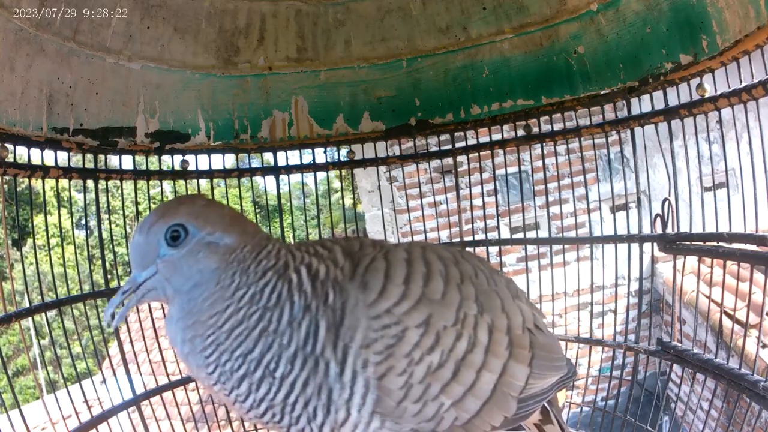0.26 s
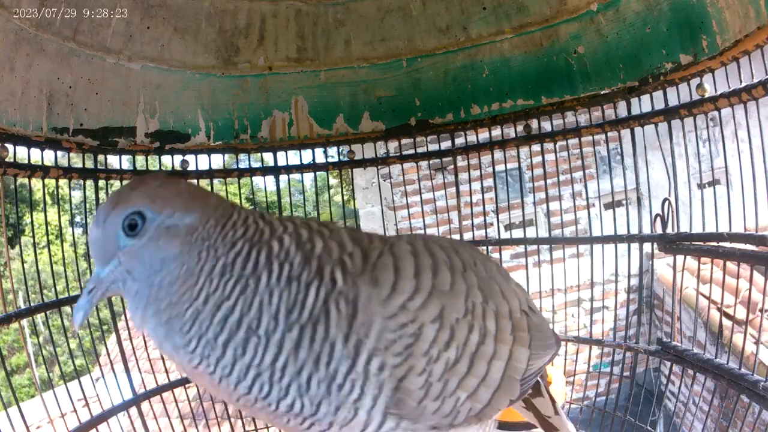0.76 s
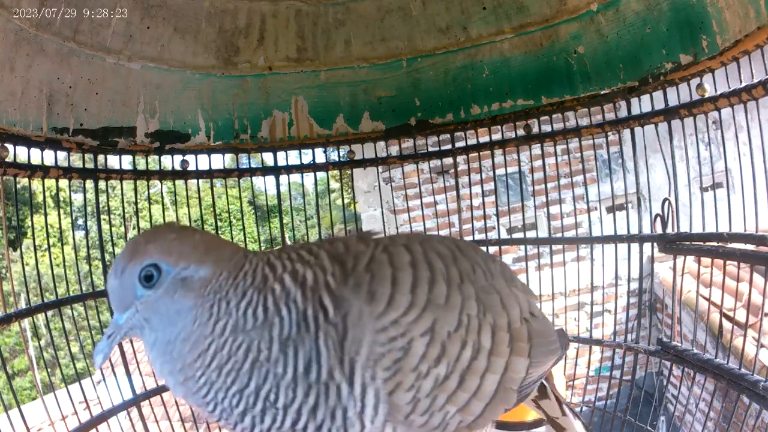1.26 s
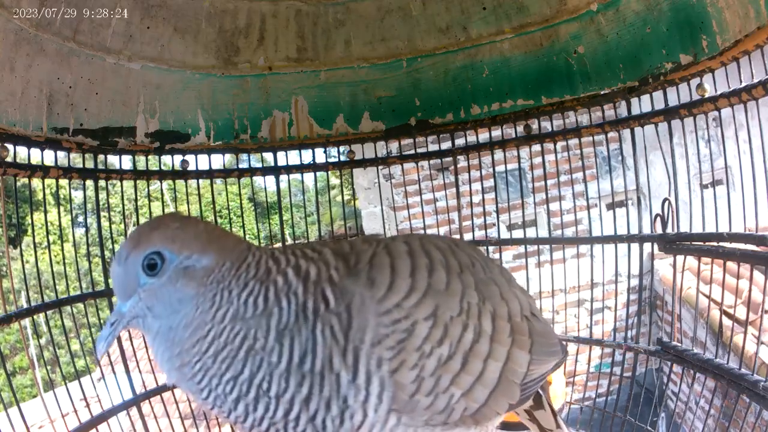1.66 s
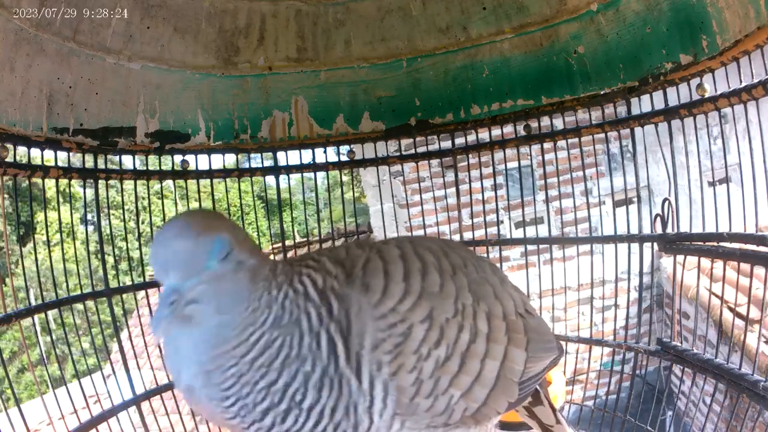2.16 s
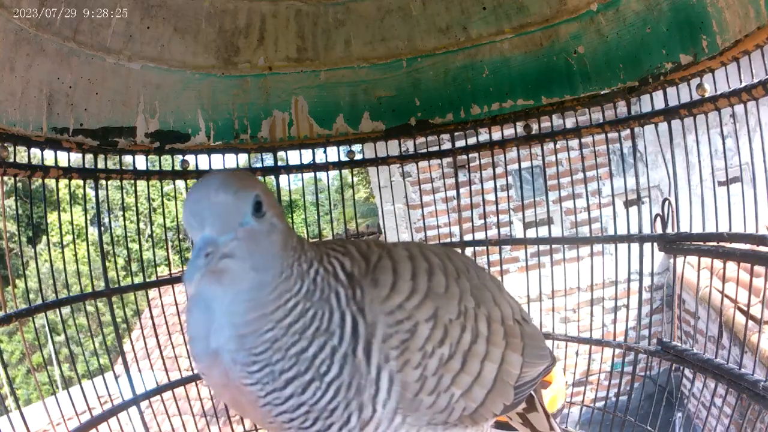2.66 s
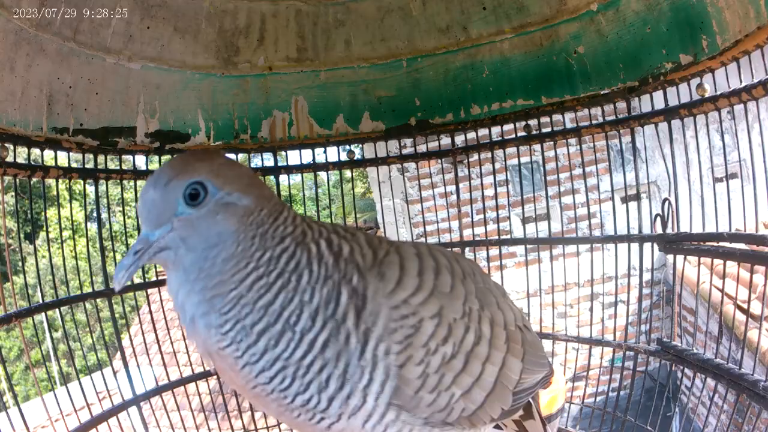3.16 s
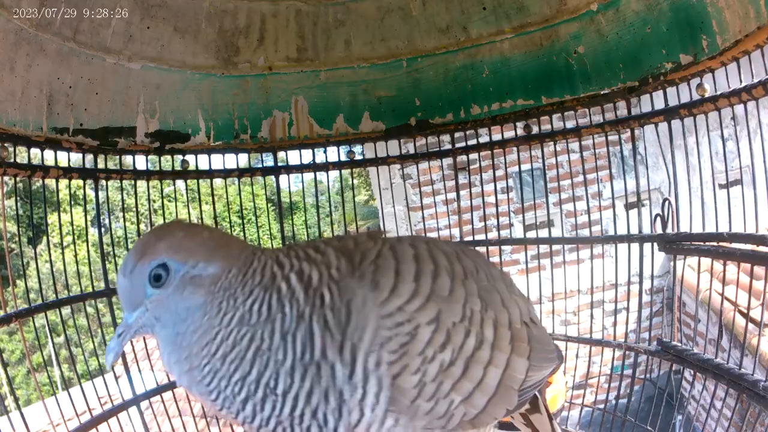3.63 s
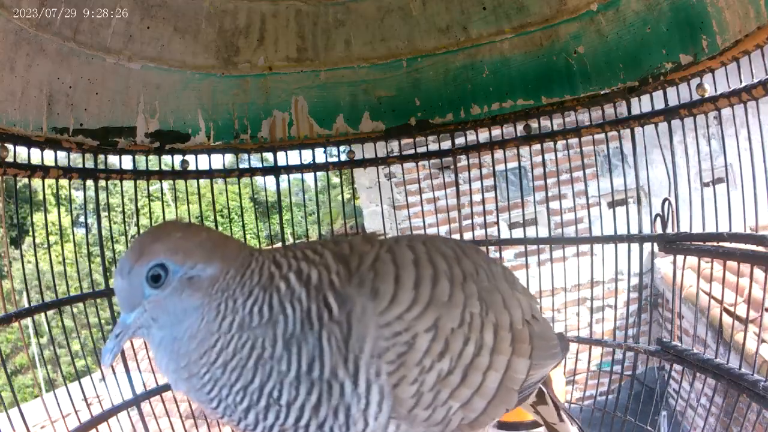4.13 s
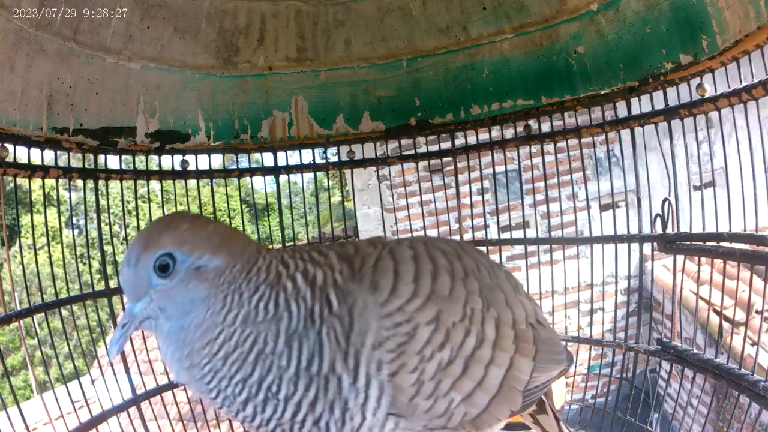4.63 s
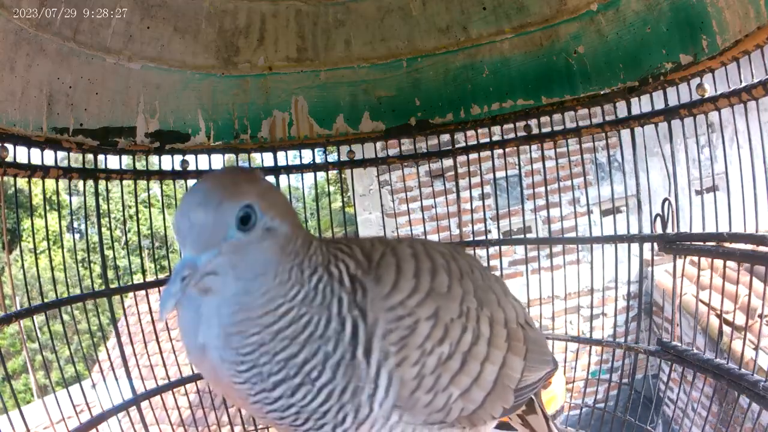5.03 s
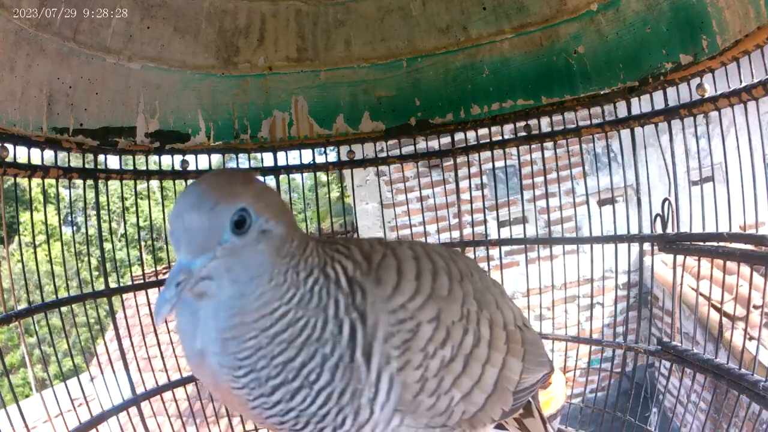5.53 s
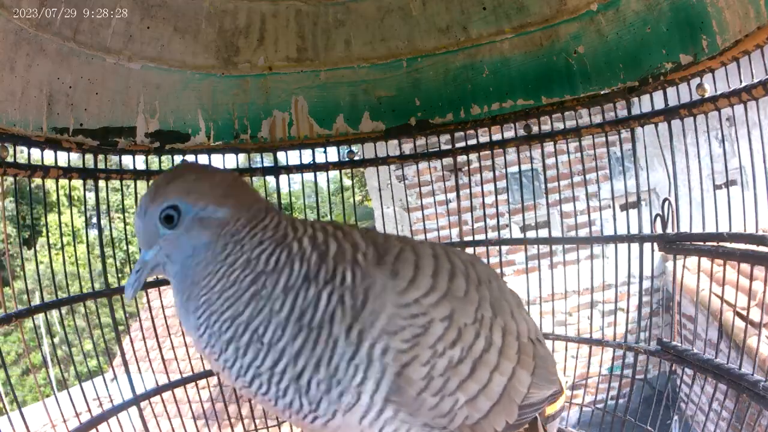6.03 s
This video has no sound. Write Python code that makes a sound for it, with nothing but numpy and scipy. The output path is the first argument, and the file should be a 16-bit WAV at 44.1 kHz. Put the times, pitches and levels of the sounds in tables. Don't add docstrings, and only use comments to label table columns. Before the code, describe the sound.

A quiet outdoor bed runs throughout: low wind buffeting the microphone, steady town rumble, slight hum and hiss, barely audible high insects. Around 0.3-0.6 s distant hoarse fowl call, and a tiny claw tick lands near 0.5. At 0.84 a soft hollow pop precedes the close dove's first burst: a loud note leaping upward at 0.9, a low grunt at 1.15, a short arched coo, then a longer falling one ending near 1.36. Background returns, with faint fowl at 2.3-2.8. Far doves answer from 3.05, blurred by echo. Another pop at 3.52 starts the second burst: leaping note at 3.59, grunt at 3.76, then four quick arched whistles, rising in pitch, the last longest, ending about 4.19. Slight cage echoes follow. Clearer hoarse fowl sound at 4.6-5.2; distant doves reply again from 6.0 to the end.

```python
import sys
import numpy as np
from scipy import signal
from scipy.fft import rfft, irfft, next_fast_len
from scipy.io import wavfile
from scipy.ndimage import uniform_filter1d, map_coordinates

SR = 44100
rng = np.random.default_rng(int(sys.argv[2]) if len(sys.argv) > 2 else 0)


def invert_db(x):
    u = np.asarray(x, float) / 20
    return 10 ** u


def digitize_waveform(pressure):
    field = np.atleast_2d(pressure).T
    bounded = np.clip(field, -1, 1)
    quanta = np.round(bounded * 32767).astype(np.int16)
    wavfile.write(sys.argv[1], SR, quanta)


N = 277389


def unit(x):
    return x / np.sqrt(np.mean(x ** 2) + 1e-20)


def along(points, hz):
    f, v = np.transpose(points)
    return np.interp(np.log(hz + 1), np.log(f + 1), v)


def add(track, s, sound):
    part = track[round(s * SR):][:len(sound)]
    part += sound[:len(part)]


def wobble(rate, size=N):
    knots = rng.standard_normal(int(size * rate / SR) + 4)
    return map_coordinates(knots, [np.arange(size) * rate / SR])


def noise(spectrum):
    m = next_fast_len(N + 8192)
    gain = invert_db(along(spectrum, np.fft.rfftfreq(m, 1 / SR)))
    return unit(irfft(rfft(rng.standard_normal(m)) * gain, m)[:N])


def tail(t60, rise):
    t = np.arange(SR // 2) / SR
    x = rng.standard_normal(len(t)) * invert_db(-60 * t / t60) * (1 - np.exp(-t / rise))
    return x / np.linalg.norm(x)


def swells(rows):
    out = np.zeros(N)
    for s, length, db in rows:
        add(out, s, invert_db(db) * np.hanning(round(length * SR)))
    return out


# peak in seconds, half width in seconds, level in dB.
PUFFS = [(0, 0.058, -54), (.33, 0.15, -50.5), (.66, 0.082, -45.5), (.95, 0.076, -49), (1.26, 0.17, -51.5),
         (1.68, 0.13, -49.5), (1.98, 0.19, -49), (2.33, 0.041, -53.5), (3.62, 0.12, -57),
         (4.27, 0.083, -50.5), (4.4, 0.048, -46), (4.74, 0.16, -55.5), (5.14, 0.12, -57),
         (5.4, 0.11, -57.5), (5.8, .22, -58)]
# frequency in Hz, density in dB per Hz.
GUSTS = [(7.1, -29), (12, 6.5), (22, 1), (56, 0.5), (135, -17.5), (160, -16), (210, -39), (350, -120)]


def wind():
    t = np.arange(N) / SR
    strength = invert_db(-61.5)
    for peak, width, db in PUFFS:
        strength = strength + invert_db(db) * np.exp(-((t - peak) / width) ** 2)
    return strength * unit(invert_db(1.8 * wobble(13)) * noise(GUSTS))


# frequency in Hz, density in dB per Hz.
TOWN = [(71, -39), (120, 0), (196, -7), (289, -7.5), (355, -12), (656, -10), (698, -12), (1160, -18.5),
        (1260, -21.5), (3520, -30.5), (14200, -33), (16000, -29)]


def town():
    return invert_db(-59 + .13 * wobble(3)) * noise(TOWN)


# frequency in Hz, level in dB.
HUM = [(100, -65.5)]


def hum():
    t = np.arange(N) / SR
    out = np.zeros(N)
    for hz, db in HUM:
        level = invert_db(db + 1.5 * wobble(4)) * np.sqrt(2)
        out += level * np.sin(2 * np.pi * hz * t + .4 * wobble(6))
    return out


# frequency in Hz, density in dB per Hz.
INSECTS = [(9000, -60), (9700, -6), (10000, 0), (10500, -6), (11500, -60)]


def insects():
    return invert_db(-86) * noise(INSECTS)


# pitch in Hz, gain on the fundamental in dB.
CROP = [(700, 0), (860, 6), (980, 6), (1100, 0), (1400, 0)]


def crop_db(pitch):
    return along(CROP, pitch)


def far_calls(calls, waver, flutter_db, direct_db, crest):
    out = np.zeros(N)
    for s, length, start_hz, top_hz, end_hz, db in calls:
        u = np.linspace(0, 1, round(length * SR))
        before, after = (top_hz - start_hz) / crest ** 2, (top_hz - end_hz) / (1 - crest) ** 2
        glide = top_hz - np.where(u < crest, before, after) * (u - crest) ** 2
        pitch = glide * (1 + waver * wobble(150, len(u)))
        envelope = np.abs(np.sin(np.pi * u)) ** .3 * invert_db(flutter_db * wobble(70, len(u)))
        call = envelope * np.sin(2 * np.pi * np.cumsum(pitch) / SR) * invert_db(.7 * crop_db(pitch))
        wet = signal.fftconvolve(call, tail(.17, rise=.003))
        add(out, s, invert_db(db) * wet * np.linalg.norm(call) / np.linalg.norm(wet))
        add(out, s, invert_db(db + direct_db) * call)
    return out


# start in seconds, length in seconds, start Hz, end Hz, level in dB.
FOWL = [(.31, .06, 1680, 1650, -70), (.37, .12, 1440, 1380, -70), (.46, .16, 1668, 1460, -73),
        (2.31, .18, 2700, 2620, -80), (2.38, .095, 1290, 1300, -73), (2.74, .12, 1490, 1490, -74),
        (4.63, .13, 935, 940, -68.5), (4.715, .2, 2440, 2370, -78), (4.80, .095, 1210, 1165, -57.5),
        (4.9, .1, 1180, 1170, -68), (4.86, .07, 1420, 1400, -72), (4.99, .2, 679, 670, -66.5)]
# start in seconds, length in seconds, level in dB.
RASPS = [
    (0.28, 0.38, -66),
    (2.247, 0.32, -69),
    (2.68, .25, -73),
    (4.72, .27, -70),
]
# frequency in Hz, density in dB per Hz.
RASP = [(700, -35), (1300, 12), (2500, -6), (4000, -8), (6000, -42)]


def fowl():
    calls = [(s, length, a, 1.01 * (a + b) / 2, b, db) for s, length, a, b, db in FOWL]
    tones = far_calls(calls, waver=.03, flutter_db=4, direct_db=-4, crest=.4)
    return tones + swells(RASPS) * noise(RASP)


# time in seconds, peak level in dB.
TICK = [
    (0.4763, -46.5),
]


def tick():
    out, t = np.zeros(N), np.arange(200) / SR
    for s, db in TICK:
        add(out, s, invert_db(db - 60 * t / .0036) * rng.standard_normal(200))
    band = signal.butter(3, [2200, 9500], "bandpass", fs=SR, output="sos")
    return signal.sosfilt(band, out)


POPS = [
    .8426,
    3.5226,
]
# frequency in Hz, level in dB, t60 in seconds.
KNOCK = [(870, 0, .02), (620, -6, .013), (1390, -5, .017)]


def creaks():
    out, t = np.zeros(N), np.arange(SR // 16) / SR
    soft_edge = (1 - np.exp(-t / .0005)) ** 2
    crop, *sides = [soft_edge * invert_db(db - 60 * t / t60) * np.cos(2 * np.pi * hz * (t - .0012))
                    for hz, db, t60 in KNOCK]
    # start s, end s, level dB, side modes dB
    runs = [(s, s + .0014, -21, -13) for s in POPS]
    runs += [(row[0] - .0148, row[0], -27, -2) for row in LEADS]
    runs += [(row[0] - .0148, row[0], -29, -2) for row in GRUNTS]
    runs += [(row[0] - .007, row[0] + .0003, -26, -3) for row in ARCS]
    runs[-1] = (runs[-1][0] - .0015, *runs[-1][1:])
    first_gap, last_gap = .0037, .0028
    for start, end, db, side_db in runs:
        s, shortfall = start - .0009, .55
        while s < end - .001:
            ring = crop + sum(invert_db(side_db + rng.normal(0, 1.5)) * side for side in sides)
            add(out, s, invert_db(db) * (1 - shortfall) * ring)
            s += np.interp(s, [start, max(end - last_gap, start + 1e-4)], [first_gap, last_gap])
            shortfall *= .4
    return invert_db(4) * signal.sosfilt(signal.butter(4, 1900, fs=SR, output="sos"), out)


# seconds after its start, pitch in Hz, effort in dB.
LEAD = [(0, 755, -31), (.004, 830, -26.5), (.0155, 890, -24.5), (.0183, 1045, -34), (.021, 1115, -28),
        (.041, 1284, -28), (.048, 1255, -29), (.056, 1115, -37), (.063, 1098, -50)]
# start in seconds, time stretch as a ratio, level in dB.
LEADS = [
    (.899, 1, 0),
    (3.585, 1, 0),
]
# seconds after its start, pitch in Hz, effort in dB.
GRUNT = [(0, 770, -31), (.003, 810, -28.5), (.008, 800, -29.5), (.013, 760, -34), (.017, 755, -35),
         (.021, 735, -52)]
# start in seconds, time stretch as a ratio, level in dB.
GRUNTS = [
    (1.145, 1, -.5),
    (3.76, 1.2, -1.5),
]


def leads_and_grunts():
    shaped = []
    for rows, shape in [(LEADS, LEAD), (GRUNTS, GRUNT)]:
        s, hz, level = np.transpose(shape)
        shaped += [(start + stretch * s, hz, level + db) for start, stretch, db in rows]
    return shaped


def arc(start, length, top_hz, end_hz, fade_db):
    s = np.arange(0, length, .0005)
    onset_hz, clear_hz, scoop_s, release_s = 775, 1115, .0106, .007
    crest, held = .012 + .225 * length, length - release_s
    scoop = onset_hz + (clear_hz - onset_hz) * (s / scoop_s) ** 1.25
    rise = top_hz - (top_hz - clear_hz) * ((crest - s) / (crest - scoop_s)).clip(0) ** 1.25
    fall = top_hz - (top_hz - end_hz) * ((s - crest) / (held - crest)).clip(0, 1) ** 2.2
    hz = np.where(s < scoop_s, scoop, np.where(s < crest, rise, fall))
    release = np.clip((s - held) / release_s, 0, 1)
    attack_db = 3 * np.clip(1 - s / .002, 0, 1)
    droop_db = 55 * s
    fading = np.minimum(s / held, 1) ** 7
    db = -27.4 - attack_db - droop_db - fade_db * fading
    return start + s, hz - 28 * release, db - 16 * release


# start in seconds, length in seconds, top Hz, end Hz, fade in dB.
ARCS = [
    (1.188, .049, 1208, 935, 12),
    (1.271, .084, 1284, 900, 1),
    (3.806, .034, 1122, 1020, 11),
    (3.866, .045, 1195, 945, 12),
    (3.955, .052, 1245, 940, 7),
    (4.0815, .1055, 1303, 930, 6),
]
# frequency in Hz, gain in dB.
THROAT = [(1500, 7.5), (1800, -17), (2200, -34), (2600, -23), (3800, -32), (5100, -38), (6200, -28),
          (6800, -32.5), (7500, -41), (8400, -50.5), (10400, -46), (14000, -50)]
# pitch in Hz, gain in dB.
OPENING = [(750, -26), (1000, -18), (1110, -3), (1300, 0)]
# frequency in Hz, density in dB per Hz.
HUSK = [(200, -6.5), (400, -13.5), (900, -3), (2000, -17), (2800, -29.5), (7000, -36), (10000, -57)]


def whistles():
    out, husk = np.zeros(N), noise(HUSK)
    for s, hz, db in leads_and_grunts() + [arc(*row) for row in ARCS]:
        t = np.arange(s[0] - .002, s[-1] + .002, 1 / SR)
        glide = uniform_filter1d(np.interp(t, s, hz), size=45)
        pitch = glide * (1 + .008 * wobble(250, len(t)))
        phase = 2 * np.pi * np.cumsum(pitch) / SR
        edges = np.clip(np.minimum(t - t[0], t[-1] - t) / .0045, 0, 1)
        effort = invert_db(np.interp(t, s, db) + .5 * wobble(300, len(t))) * edges * np.sqrt(2)
        slack_db = 26 * ((t - t[0]) / (t[-1] - t[0])) ** 5
        bright_db = along(OPENING, pitch) - slack_db
        voice = invert_db(crop_db(pitch)) * np.sin(phase)
        voice += invert_db(-24.5) * husk[round(t[0] * SR):][:len(t)]
        for k in range(2, 12):
            scatter_db = 2.5 * wobble(90, len(t))
            level = invert_db(along(THROAT, k * pitch) + bright_db + scatter_db)
            voice += level * np.sin(k * phase + rng.uniform(0, 2 * np.pi))
        add(out, t[0], effort * voice)
    return out


# delay in seconds, level in dB.
WALLS = [(.008, -29), (.019, -29), (.032, -32), (.055, -40), (.080, -43)]


def cage(x):
    out = x + invert_db(-34) * signal.fftconvolve(x, tail(.25, rise=.015))[:N]
    for s, db in WALLS:
        add(out, s, invert_db(db) * x)
    return out


# start in seconds, length in seconds, start Hz, top Hz, level in dB.
HELD = [
    (3.05, .07, 880, 1000, -58),
    (3.078, .1, 1250, 1312, -50.5),
    (3.372, .07, 890, 985, -58),
    (3.645, .075, 1290, 1330, -52),
    (5.998, .066, 900, 995, -57),
    (6.022, .103, 1260, 1325, -51.5),
    (6.255, .035, 930, 960, -61),
]
# start in seconds, length in seconds, top Hz, level in dB.
DOVES = [(3.07, .05, 1200, -59), (3.185, .05, 1310, -53.5), (3.225, .05, 1245, -55), (3.27, .06, 1200, -55),
         (3.385, .05, 1200, -55.5), (3.478, .056, 1230, -57), (6.025, .045, 1200, -59),
         (6.13, .048, 1280, -55), (6.175, .055, 1240, -56), (6.235, .05, 1220, -56)]
# start in seconds, length in seconds, level in dB.
WASHES = [
    (3.04, .3, -61),
    (3.35, .22, -62),
    (5.99, .2, -60),
    (6.12, .3, -62),
]
# frequency in Hz, density in dB per Hz.
WASH = [(700, -40), (880, -3), (1000, 0), (1250, 0), (1380, -8), (1600, -45)]


def far_doves():
    held = [(s, length, low, hz, .97 * hz, db) for s, length, low, hz, db in HELD]
    quick = [(s, length, .76 * hz, hz, .93 * hz, db) for s, length, hz, db in DOVES]
    out = far_calls(held, waver=.02, flutter_db=3, direct_db=0, crest=.4)
    out += far_calls(quick, waver=.028, flutter_db=3.5, direct_db=-3, crest=.35)
    return out + swells(WASHES) * noise(WASH)


def scene():
    air = wind() + town() + hum() + insects()
    near_dove = cage(creaks() + whistles())
    return (air + fowl() + tick() + near_dove + far_doves())[None]


def roll_off(x):
    return signal.sosfilt(signal.butter(12, 16250, fs=SR, output="sos"), x)


def record(dry):
    m = next_fast_len(N + 8192)
    passed = np.fft.rfftfreq(m, 1 / SR) < 15750
    kept = irfft(rfft(dry, m) * passed, m)[:, :N]
    mix = kept - .0083
    return roll_off(mix)


dry = scene()
out = record(dry)
digitize_waveform(out)
```